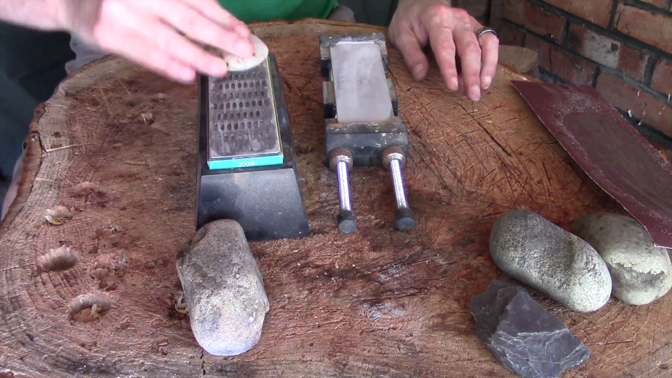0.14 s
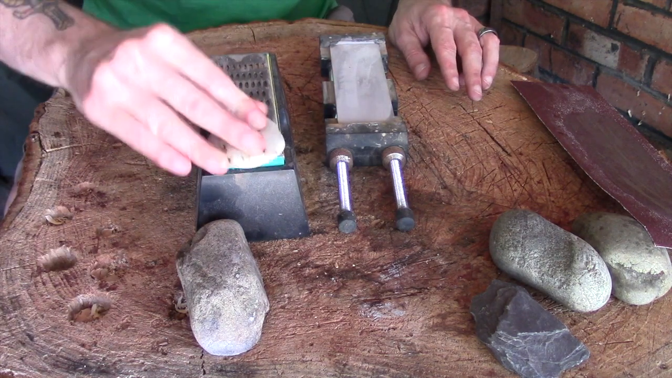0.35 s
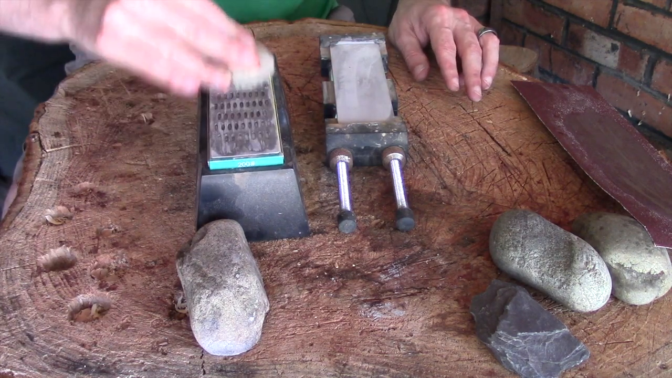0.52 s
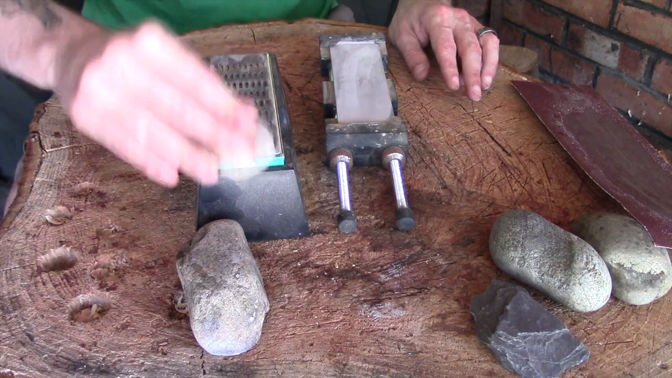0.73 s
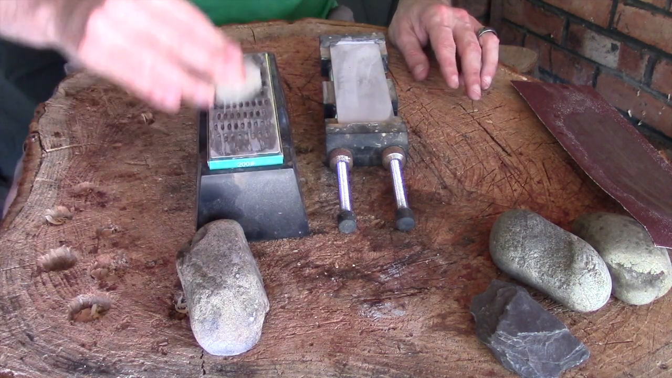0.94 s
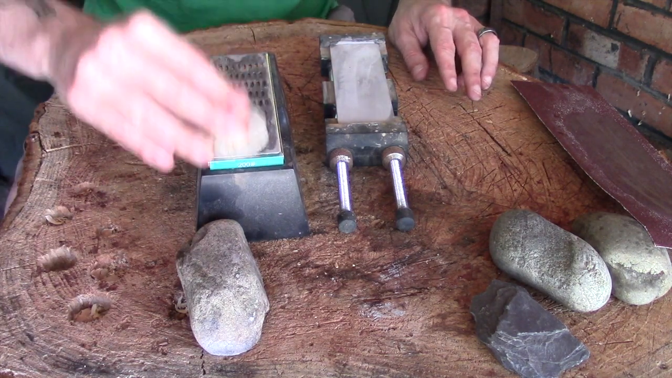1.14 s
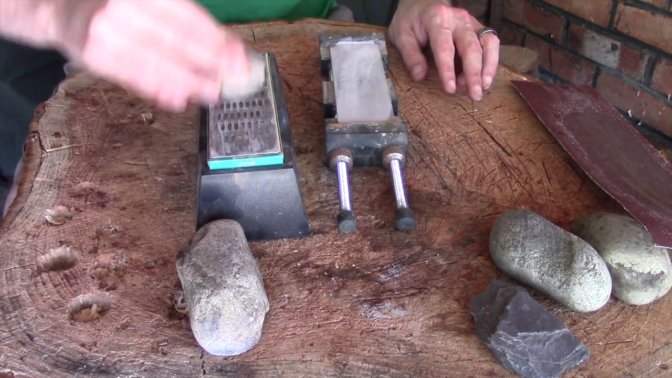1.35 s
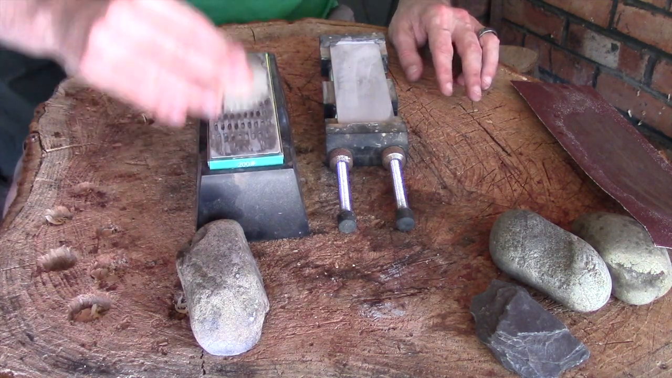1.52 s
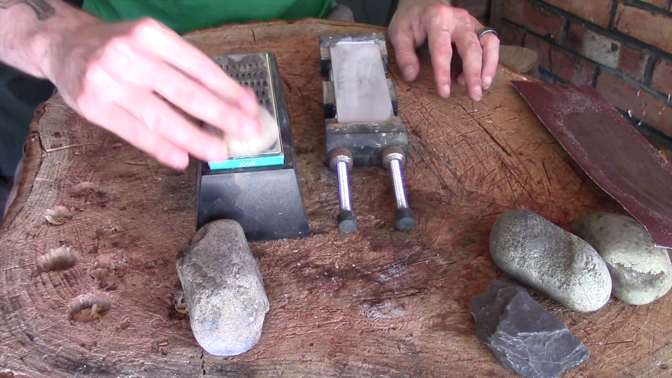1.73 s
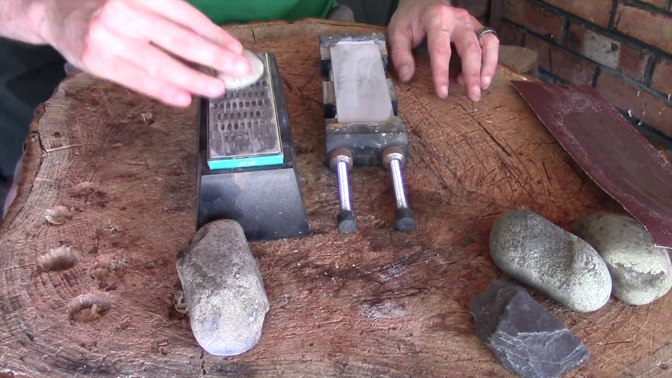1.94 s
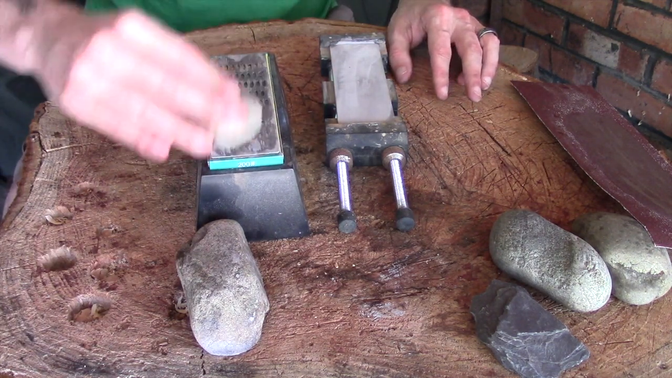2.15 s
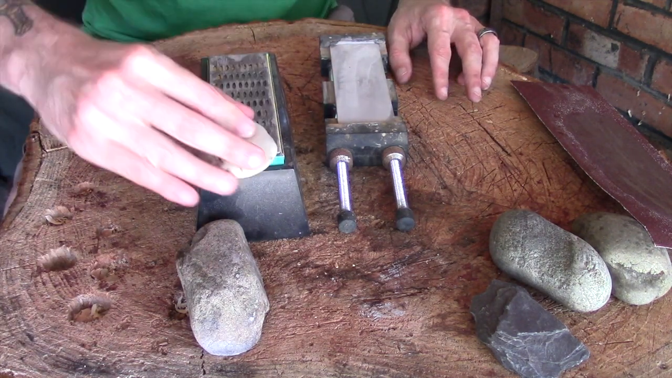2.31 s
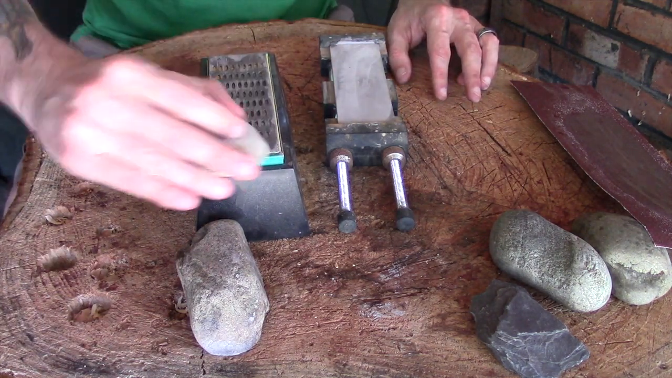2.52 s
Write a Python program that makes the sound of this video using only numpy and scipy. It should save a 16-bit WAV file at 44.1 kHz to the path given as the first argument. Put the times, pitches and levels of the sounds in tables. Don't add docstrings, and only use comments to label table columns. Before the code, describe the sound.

Fast rasping rub of a stone on a gritty plate, scraping to and fro, ending in a tap

```python
import sys
import numpy as np
from scipy import signal
from scipy.fft import rfft, irfft, next_fast_len
from scipy.io import wavfile
from scipy.ndimage import uniform_filter1d, map_coordinates

SR = 44100
rng = np.random.default_rng(int(sys.argv[2]) if len(sys.argv) > 2 else 0)


def invert_db(level):
    return 10 ** (np.asarray(level, dtype=float) / 20)


def put_to_file(sound):
    columns = np.atleast_2d(sound).T
    safe = np.clip(columns, -1, 1)
    whole_steps = np.round(safe * 32767)
    wavfile.write(sys.argv[1], SR, whole_steps.astype(np.int16))


N = 112455
T = np.arange(N) / SR
FULL_DB = -12
CLUMP_DB = 1.36
QUICK_END_S = 0.2233

# frequency in Hz, width in Hz, level in dB.
HOLDER_MODES = [(155, 14, -39), (276, 25, -10), (407.8, 16.8, 8), (490, 29, -4.5), (572, 15, -7.5),
                (667, 17, -5.5), (806, 54, -2.5), (908, 48, -2.5), (1027, 77, -7), (1125, 37, 0),
                (1176, 20, -1.5), (1340, 88, -4.5), (1434, 125, -6), (1670, 290, -11)]


def unit(x):
    return x / np.sqrt(np.mean(x ** 2) + 1e-20)


def along(points, hz):
    f, v = np.transpose(points)
    return np.interp(np.log(hz + 1), np.log(f + 1), v)


def wobble(rate):
    return map_coordinates(rng.standard_normal(N // 20), [T * rate])


def filtered(x, response):
    m = next_fast_len(N + SR // 2)
    return irfft(rfft(x, m) * response(np.fft.rfftfreq(m, 1 / SR)), m)[..., :N]


def coloured(x, spectrum):
    return unit(filtered(x, lambda hz: invert_db(along(spectrum, hz))))


def modes(table, speed=1, sign=-1):
    def response(f):
        total = 0
        for k, (centre, width, db) in enumerate(table):
            damping = 1j * f * width * speed
            total = total + sign ** k * invert_db(db) * damping / ((centre * speed) ** 2 - f * f + damping)
        return total
    return response


def grit(clump_db):
    grains_per_s, spread_db = 16000, 2.5
    hit, size, sign = rng.random(N), rng.standard_exponential(N), rng.standard_normal(N)
    grains = (hit < grains_per_s / SR) * sign * invert_db(spread_db * np.minimum(size, 3))
    return unit(grains) * invert_db(clump_db * (wobble(45.16) + 1.3 * wobble(220)))


def patchy(x, patchy_db):
    z = signal.stft(x, nperseg=256)[2]
    field = rng.standard_normal(z.shape)
    field = uniform_filter1d(uniform_filter1d(field, 6, 0), 9, 1)
    return unit(signal.istft(z * invert_db(patchy_db * unit(field)), nperseg=256)[1][:N])


def strokes():
    # start in seconds, stop in seconds, level in dB, fastest moment in seconds, extra dB then.
    passes = [(0.197, 0.369, -13, 0.27, 1.5), (0.374, 0.584, -13.5, .49, 3.5),
              (0.593, 0.782, -12, .66, 0.5), (0.8, 1.018, -12, .905, 1), (1.021, 1.228, -14, 1.12, 2.5),
              (1.228, 1.439, -13, 1.331, 2), (1.46, 1.689, -13, 1.57, 1.5), (1.699, 2.005, -16, 1.83, 4),
              (2.028, 2.35, -18, 2.118, 6), (2.29, 2.358, -41, 2.33, -5), (2.355, 2.46, -60, 2.375, 14.5),
              (2.416, 2.499, -50, 2.457, 6), (2.473, 2.587, -53.5, 2.48, 17)]
    # weight of the hand in dB, slowing time in s, surge width in s, brightness in dB.
    hand_moves = [(1.3, 0.034, 0.024, 1.5), (-0.8, 0.04, 0.027, 0.3), (-0.5, 0.034, 0.036, 2),
                  (-0.4, 0.042, 0.015, -0.2), (-0.5, 0.048, 0.03, 0.4), (2, 0.031, 0.045, 1),
                  (0.5, 0.057, 0.031, 1.6), (-2.5, 0.058, 0.042, -1.3), (2.5, 0.11, 0.082, -1),
                  (6, 0.041, .03, 2), (-2, 0.045, 0.019, -12), (1, 0.033, 0.016, -2),
                  (-9.5, 0.3, 0.017, -2)]
    start_s, start_db, start_bend = .024, 28, 2.2
    stop_db, stop_bend, rest_db = 32, 1.62, -78.5
    surge_flat = 1.94
    a, b, level, mid, extra = np.transpose(passes)[:, :, None]
    press_db, stop_s, surge_s, bright_db = np.transpose(hand_moves)[:, :, None]
    surge = extra * np.exp(-.5 * np.abs((T - mid) / surge_s) ** surge_flat)
    starting = start_db * np.clip(1 - (T - a) / start_s, 0, None) ** start_bend
    stopping = stop_db * np.clip(1 + (T - b) / stop_s, 0, None) ** stop_bend
    db = level + surge - starting - stopping
    loudest = db.max(0)
    hand = uniform_filter1d(np.array([press_db, bright_db])[:, db.argmax(0), 0], size=441)
    return np.maximum(loudest, rest_db) - FULL_DB, surge.max(0), hand, loudest > rest_db


def grinding():
    # frequency in Hz, level in dB per Hz.
    hiss_spectrum = [(2530, -50.5), (4300, -15), (5300, -5.5), (6430, 6), (7010, 4.5), (9890, 3.5),
                     (11800, 2), (13600, -10), (15500, -4)]
    # frequency in Hz, level in dB per Hz.
    rasp_spectrum = [(1120, -15.5), (1900, -16.5), (2010, -11.5), (2720, -0.5), (3300, -3.5), (3570, -2),
                     (5500, -7), (7150, -14), (12100, -120)]
    # frequency in Hz, level in dB per Hz.
    shine_spectrum = [(4500, -47.5), (6500, -10.5), (9200, 1.6), (11500, -4.5), (14500, -7), (15700, -35)]
    # frequency in Hz, level in dB per Hz.
    stump_spectrum = [(110, -54), (200, -43), (300, -7), (420, -3.5), (800, 1), (1300, -3), (1900, -5.5),
                      (3500, -28), (8000, -62)]
    # frequency in Hz, width in Hz, level in dB.
    plate_modes = [(2620, 67, -40), (6440, 350, 17.5), (8280, 140, 23.5), (9100, 1030, 30.5)]
    hiss_db, rasp_db, shine_db, sing_db, body_db, stump_db, hum_db = -3, -5.5, -4.5, -8, -13, -2, -7.5
    hiss_grows, rasp_grows, shine_grows, body_grows, top_grows = 0.98, 0.66, 3.7, 0.25, .35
    shine_surge, body_surge = 1, 0.037
    top_from_hz = 13400

    speed_db, surge_db, (press_db, bright_db), moving = strokes()
    on = uniform_filter1d(moving * 1., size=441) * np.clip((T - QUICK_END_S) / .006 + .5, 0, 1)
    speed_db = speed_db + .5 * wobble(12.55)
    fine = grit(CLUMP_DB)

    hiss = patchy(coloured(fine, hiss_spectrum), patchy_db=3.0)
    hiss = hiss * invert_db(hiss_db + hiss_grows * speed_db + bright_db)
    top = filtered(hiss, lambda hz: 1 / (1 + (top_from_hz / (hz + 1)) ** 8))
    hiss = hiss + top * (invert_db(top_grows * np.minimum(speed_db, 3)) - 1)

    shine = patchy(coloured(grit(CLUMP_DB), shine_spectrum), patchy_db=0.0)
    shine = shine * invert_db(shine_db + shine_grows * speed_db + shine_surge * surge_db + bright_db)

    plate_push = fine * on * invert_db(speed_db + 2.0 * wobble(32.28))
    sing = unit(filtered(plate_push, modes(plate_modes))) * invert_db(sing_db)

    rasp = patchy(coloured(0.49 * fine + 0.98 * grit(.5 * CLUMP_DB), rasp_spectrum), patchy_db=1.9)
    rasp = rasp * invert_db(rasp_db + rasp_grows * speed_db + 0.14 * press_db)

    steady_db = body_grows * (speed_db - surge_db)
    drive = invert_db(steady_db + body_surge * surge_db + press_db + wobble(22.25)) * on
    hum_hz, hum_wide, hum_level = HOLDER_MODES[2]
    ring = modes([HOLDER_MODES[1], (hum_hz, hum_wide, hum_level + hum_db)] + HOLDER_MODES[3:])
    coarse = rng.standard_normal((2, N)) * invert_db(wobble(60))
    body = filtered(coarse[0] * drive, ring) / np.std(filtered(coarse[0], ring))
    body = body + invert_db(stump_db) * drive * coloured(coarse[1], stump_spectrum)
    body = patchy(body, patchy_db=2.0) * np.std(body)
    return invert_db(FULL_DB) * (on * (hiss + shine + rasp) + sing + invert_db(body_db) * body)


def snags(rows, rise_s, t60, gain_db):
    s, db, hz = np.transpose(rows)[:, :, None]
    t = np.arange(SR // 4) / SR
    place = (s * SR).astype(int) + np.arange(len(t))
    unsteady = 0.5 * wobble(40)[np.minimum(place, N - 1)]
    phase = 2 * np.pi * (hz * t + rng.random((len(rows), 1))) + unsteady
    swell = np.sin(np.pi / 2 * np.clip(t / rise_s, 0, 1)) ** 2
    make_up = invert_db(60 * rise_s / t60)
    ring = invert_db(db + gain_db - 60 * t / t60) * swell * np.sin(phase) * make_up
    return np.bincount(place.ravel(), ring.ravel(), N + SR)[:N]


def holder():
    # time in seconds, peak in dB, pitch in Hz.
    booms = [(0.228, -27.5, 385), (0.278, -20.5, 419), (0.341, -27, 391), (0.418, -23.5, 430),
             (0.455, -22, 410), (0.519, -24.5, 392), (0.61, -25.5, 420), (0.652, -28.5, 373),
             (0.69, -17, 403), (0.76, -32.5, 380), (0.807, -10.5, 393.6), (0.816, -13.5, 411.5),
             (0.889, -21.5, 419), (0.925, -24, 389), (1.06, -25, 416), (1.117, -18.5, 416),
             (1.154, -21.5, 409), (1.2, -37, 390), (1.278, -21.5, 429), (1.327, -20, 400),
             (1.366, -22.5, 394), (1.421, -26, 417), (1.478, -19.5, 408), (1.53, -31, 388),
             (1.574, -19, 417), (1.667, -28.5, 398), (1.739, -22.5, 402.5), (1.78, -20, 424),
             (1.828, -26, 415), (1.932, -22.5, 403.4), (1.959, -23, 411), (2.039, -27, 397),
             (2.097, -21, 417.5), (2.138, -17, 410), (2.18, -34, 396), (2.255, -29, 406),
             (2.28, -24.5, 404), (2.339, -47, 413), (2.373, -20.5, 414), (2.462, -30, 398)]
    # time in seconds, peak in dB, pitch in Hz.
    plate_low = [(0.421, -19, 842), (0.629, -21, 839), (0.757, -16.5, 840), (0.856, -12, 810),
                 (1.134, -24, 824), (1.169, -14.5, 826), (1.292, -19.5, 804), (1.468, -28, 835),
                 (1.716, -19, 822), (2.073, -29, 835), (2.192, -21, 840), (2.329, -27.5, 833)]
    # time in seconds, peak in dB, pitch in Hz.
    plate_high = [(0.2297, -22, 1128), (0.2997, -16.5, 1119), (0.613, -24, 1080), (0.687, -19, 1110),
                  (0.8974, -29, 1146), (1.1552, -13, 1161), (1.5967, -15.5, 1159), (1.6289, -17.5, 1150),
                  (2.1502, -16.5, 1110), (2.2504, -18.5, 1140), (2.366, -28, 1125)]
    # time in seconds, peak in dB, pitch in Hz.
    plate_edge = [
        (2.181, -14, 656),
        (2.266, -20, 667),
    ]
    boom = snags(booms, rise_s=.011, t60=.14, gain_db=0.5)
    return boom + snags(plate_low + plate_high + plate_edge, rise_s=.006, t60=.13, gain_db=-1.5)


def knocks():
    knock_s = [.8058, .8135, .834, 2.092, 2.367]
    # level in dB, contact time in ms, thump in dB, rattle in dB.
    blows = [
        (-1, 0.35, -18.5, -5.5),
        (-17, 0.363, -41, -26.5),
        (-12, 0.18, -67, -14),
        (-21, 0.79, -36.5, -38),
        (-23.5, 0.12, -62, -24.5),
    ]
    # frequency in Hz, width in Hz, level in dB.
    struck_modes = [(290, 25, -3), (419, 14, -0.5), (566, 120, -7.5), (690, 63, -3.5), (842, 51, -4),
                    (925, 64, -5), (987, 84, -5), (1110, 18.4, 4), (1310, 78, -4)]
    # frequency in Hz, width in Hz, level in dB.
    thump_mode = [(155, 14, 0)]
    rattle_s, rattle_top_hz = .1, 1710
    crack_db, crack_s, crack_top_hz = -9, .012, 5000
    s = np.array(knock_s)[:, None]
    db, ms, thump_db, rattle_db = np.transpose(blows)[:, :, None]
    u = np.clip((T - s) * 1000 / ms, 0, 60)
    after = np.clip(T - s, 0, 1)
    push = invert_db(16.5) * u * np.exp(-u) / ms

    def burst(level_db, t60):
        return (invert_db(level_db - 60 * after / t60) * (T > s)).sum(0) * rng.standard_normal(N)

    rattle = filtered(burst(rattle_db, rattle_s), lambda f: 1 / (1 + 1j * f / rattle_top_hz) ** 2)
    ring = filtered((invert_db(db) * push).sum(0) + invert_db(23) * rattle, modes(struck_modes, sign=-0.98))
    crack = filtered(burst(db + crack_db, crack_s), lambda f: 1 / (1 + 1j * f / crack_top_hz) ** 2)
    thump = filtered((push * invert_db(thump_db + 10.5)).sum(0),
                     lambda f: modes(thump_mode)(f) * (1j * f / (130 + 1j * f)) ** 2)
    return ring + crack, thump


def tick():
    tick_s, tick_db, t60 = 2.3665, -22, .045
    decay = invert_db(tick_db - 60 * np.clip(T - tick_s, 0, 1) / t60)
    burst = decay * (T > tick_s) * rng.standard_normal(N)
    return filtered(burst, lambda f: 1j * f / (1500 + 1j * f) / (1 + 1j * f / 5000) ** 2)


def scuff():
    # frequency in Hz, width in Hz, level in dB.
    scuff_modes = [(1280, 170, -2.5), (2310, 140, 4.5), (2750, 300, -5.5), (4040, 800, -7.5)]
    scuff_s, wide_s, scuff_db = 2.456, 0.011, -26.5
    slide = np.exp(-.5 * np.abs((T - scuff_s) / wide_s) ** 3)
    return invert_db(scuff_db) * unit(filtered(grit(CLUMP_DB), modes(scuff_modes))) * slide


def fast_forward():
    # start in seconds, level in dB.
    quick_strokes = [(-.004, -27.5), (0.0213, -29), (0.05, -27.5), (0.074, -29), (0.1, -28.5),
                     (0.1257, -28.5), (0.1538, -28), (0.1815, -29), (0.205, -29), (.232, -30)]
    # frequency in Hz, level in dB per Hz.
    quick_spectrum = [(35, -60), (60, -16), (2470, -12), (2910, -40), (3200, -11.5), (4320, -8), (6730, -2),
                      (15500, -7)]
    # frequency in Hz, width in Hz, level in dB.
    quick_rings = [(3300, 73, -0.5), (6850, 80, -2), (9200, 65, -7), (9000, 80, 1)]
    speed, depth, friction_db, rings_db = 8, 0.84, 2.5, -3.5
    s, db = np.transpose(quick_strokes)
    k = np.clip(np.searchsorted(s, T) - 1, 0, len(s) - 2)
    u = np.clip((T - s[k]) / np.diff(s)[k], 0, 1)
    shape = (1 - depth) + depth * np.clip(np.minimum(u / 0.045, (1 - u) / 0.25), 0, 1)
    drive = invert_db(db[k] + 0.51 * wobble(140)) * shape * np.clip((QUICK_END_S - T) / 0.0037, 0, 1)
    noise = rng.standard_normal((2, N))
    ring = modes(HOLDER_MODES[2:], speed)
    body = filtered(noise[0] * drive, ring) / np.std(filtered(noise[0], ring))
    rings = drive * unit(filtered(noise[1], lambda f: modes(quick_rings)(f) ** 2))
    friction = drive * coloured(noise[1], quick_spectrum)
    return invert_db(rings_db) * rings + body + invert_db(friction_db) * friction


def wall(x):
    # frequency in Hz, decay by 60 dB in seconds.
    wall_decay = [(200, 0.061), (1500, 0.064), (6000, 0.24), (15000, 0.025)]
    longer = np.array([1, 3.1])[:, None, None]
    hz, t, z = signal.stft(rng.standard_normal((2, SR // 3)), SR, nperseg=128)
    t60 = along(wall_decay, hz)[:, None] * longer
    tail = signal.istft(z * invert_db(-60 * t / t60) / np.sqrt(t60), SR, nperseg=128)[1]
    tail = tail / np.linalg.norm(tail, axis=1)[:, None]
    delayed = np.pad(x, (150, 0))[None]
    return signal.fftconvolve(delayed, tail, axes=1)[:, :N]


def yard():
    # frequency in Hz, level in dB per Hz.
    air_spectrum = [(15, -50.5), (25, -24), (129, -3), (233, -15), (742, 3), (1380, -30), (1530, -1.5),
                    (5590, -17), (15500, -59)]
    # frequency in Hz, level in dB per Hz.
    rumble_spectrum = [(12, -51), (20, -33.5), (200, -10), (260, -20), (440, -120)]
    air_db, rumble_db = -51, -56
    noise = rng.standard_normal((2, N)) + 0.71 * rng.standard_normal((2, 2, N))
    normal = np.clip((T - QUICK_END_S) / .01, 0, 1)
    air = invert_db(air_db) * coloured(noise[:, 0], air_spectrum)
    rumble = invert_db(rumble_db + 2.17 * wobble(9.23)) * coloured(noise[:, 1], rumble_spectrum)
    return normal * (air + rumble)


def scene():
    # frequency in Hz, side over mid in dB.
    side_width = [(60, -6), (130, -19), (290, -23), (700, -23), (1400, -31), (3100, -29.5), (8000, -22),
                  (11000, -27), (15000, -49)]
    # frequency in Hz, level difference in dB.
    port_lean = [(60, 2.2), (250, 1.9), (700, 1.3), (1400, .4), (2200, 0)]
    bass_cut_hz, wall_db, width_db, split_hz = 168, -11, 0.5, 1500

    def cut(hz):
        return (1j * hz / (bass_cut_hz + 1j * hz)) ** 2

    def wide(hz):
        return invert_db(width_db + along(side_width, hz))

    ring, thump = knocks()
    near = thump + filtered(filtered(grinding() + ring, cut), cut) + holder() + scuff() + tick()
    wet, apart = wall(near)
    mid = near + invert_db(wall_db) * wet + fast_forward()
    scraps = patchy(apart, patchy_db=12) * np.std(apart)
    side = filtered(apart, lambda hz: wide(hz) * (hz < split_hz))
    side = side + filtered(scraps, lambda hz: wide(hz) * (hz >= split_hz))
    both = filtered(mid + yard(), lambda hz: invert_db(along(port_lean, hz) * np.array([[.5], [-.5]])))
    return both + side * [[1], [-1]]


def low_pass(x):
    return signal.sosfilt(signal.butter(12, 15680, fs=SR, output="sos"), x)


def record(dry):
    top_hz, clip_top, hardness = 15700, 0.9, 12
    x = filtered(dry, lambda hz: hz < top_hz)
    clipped = x / (1 + np.abs(x / clip_top) ** hardness) ** (1 / hardness)
    return low_pass(clipped)


dry = scene()
out = record(dry)
put_to_file(out)
```